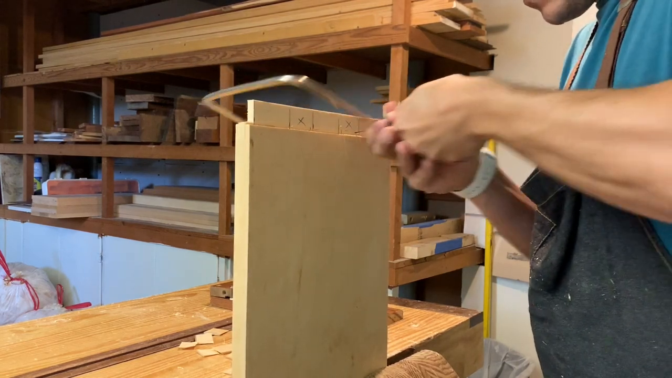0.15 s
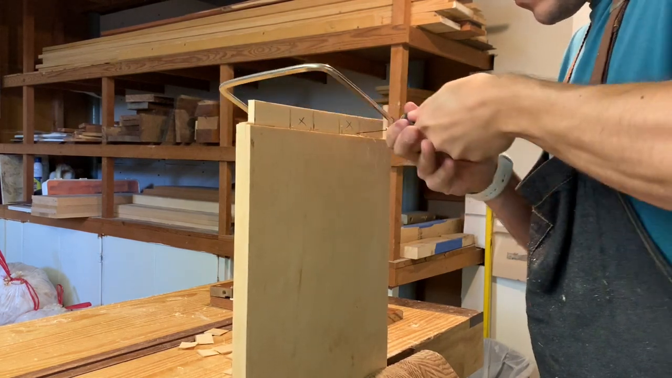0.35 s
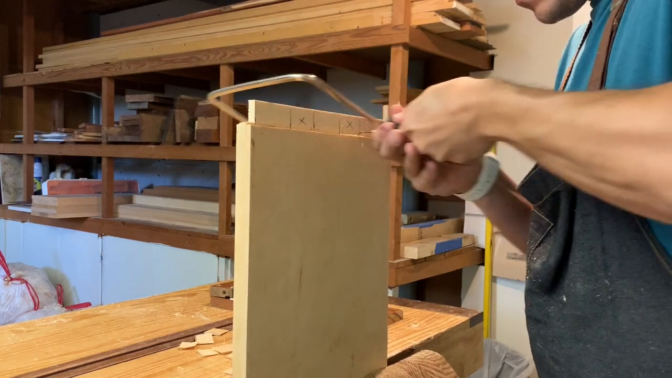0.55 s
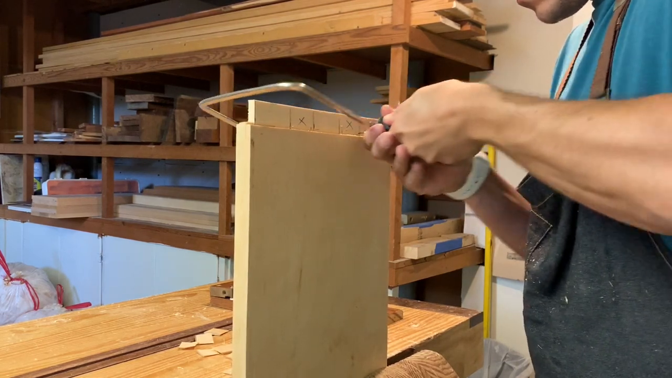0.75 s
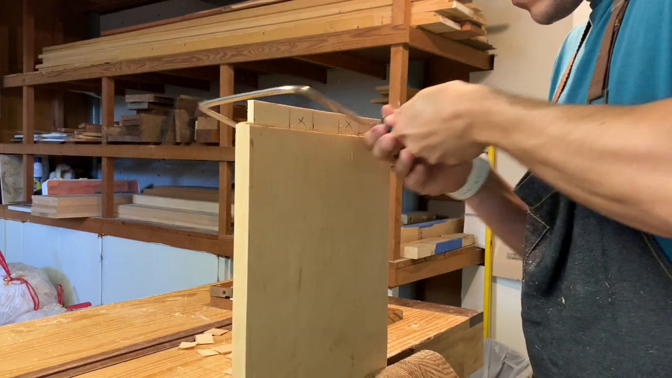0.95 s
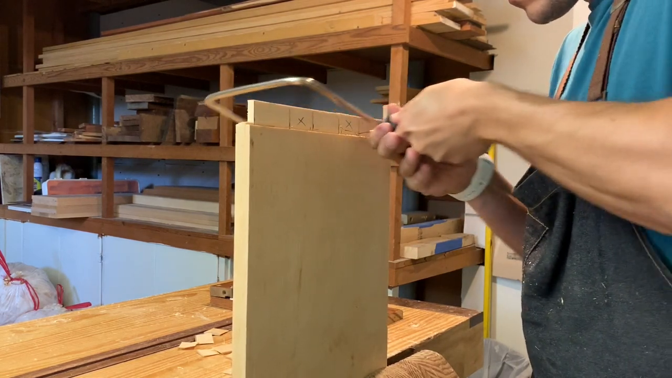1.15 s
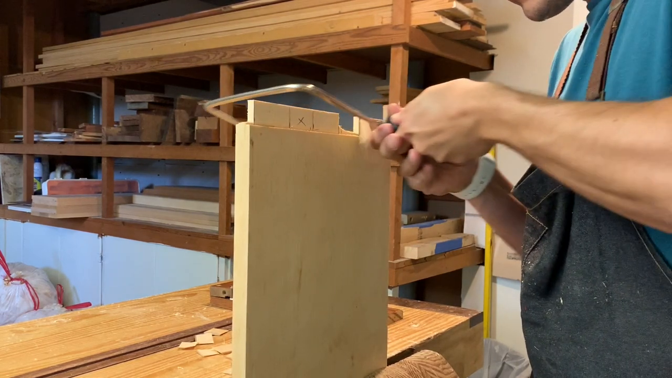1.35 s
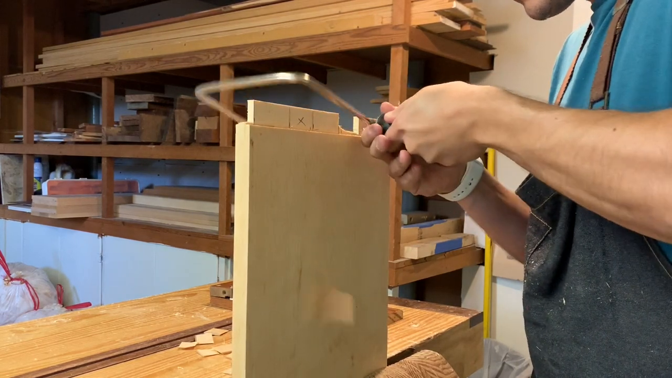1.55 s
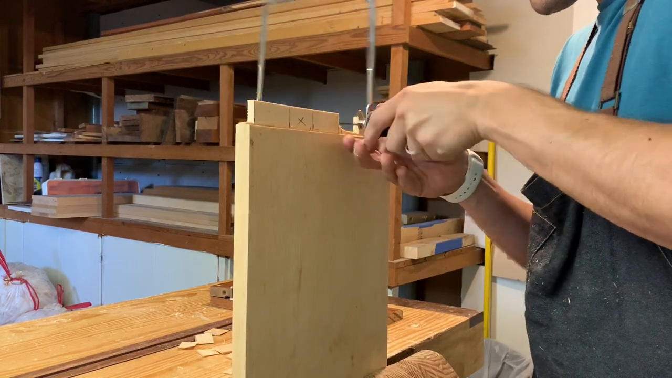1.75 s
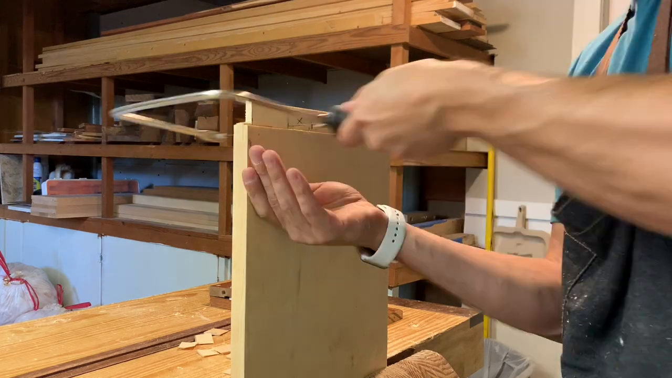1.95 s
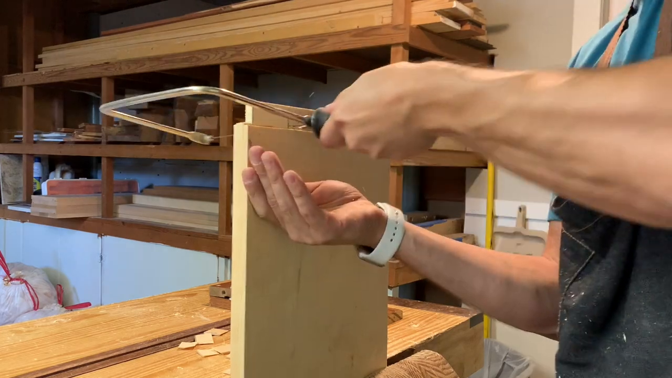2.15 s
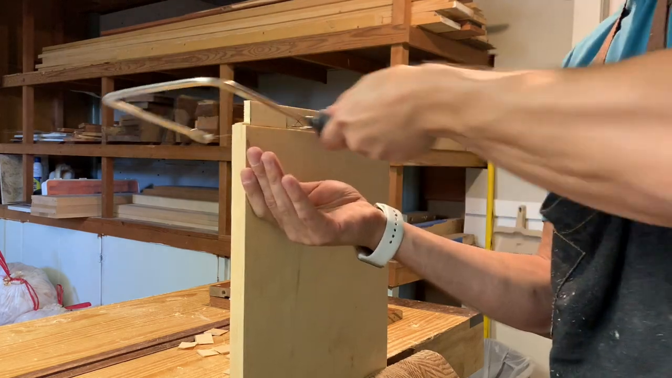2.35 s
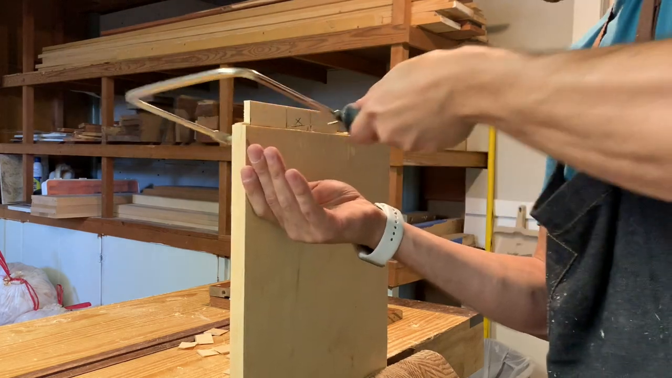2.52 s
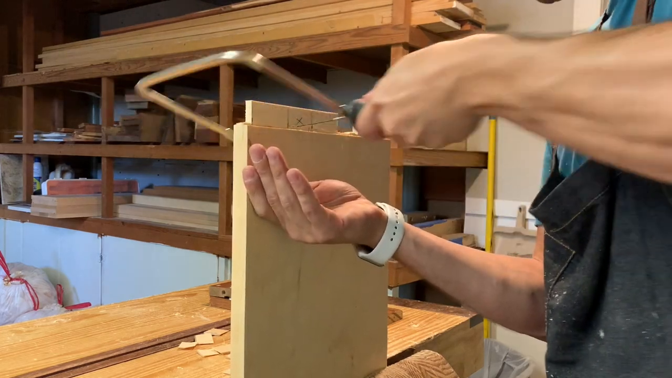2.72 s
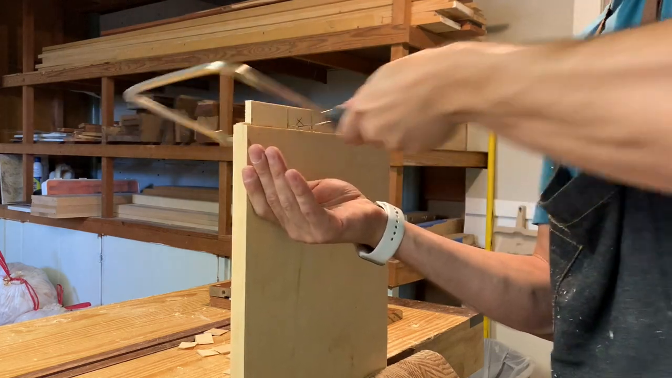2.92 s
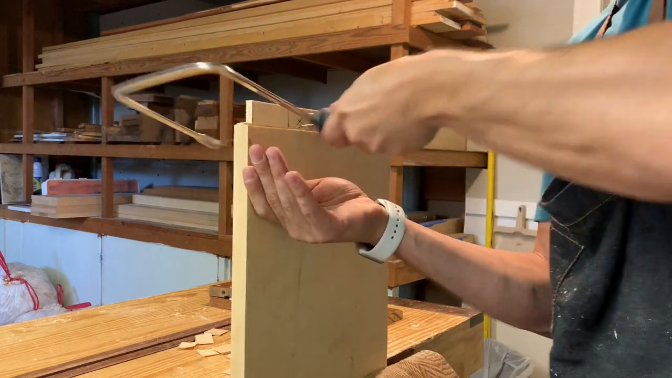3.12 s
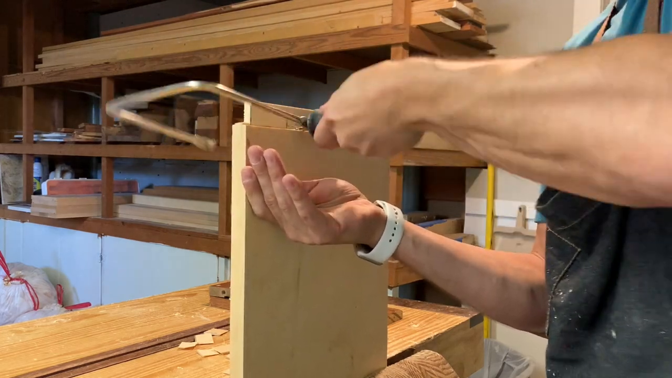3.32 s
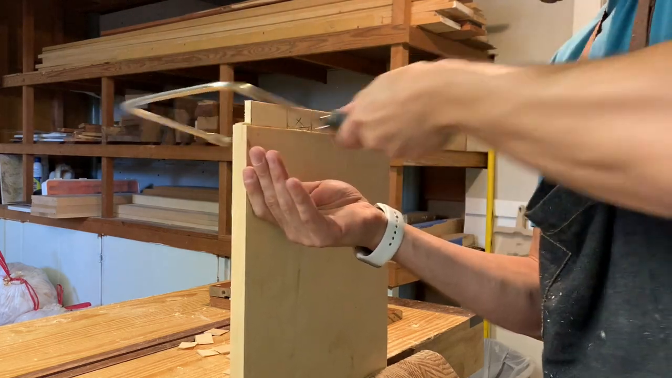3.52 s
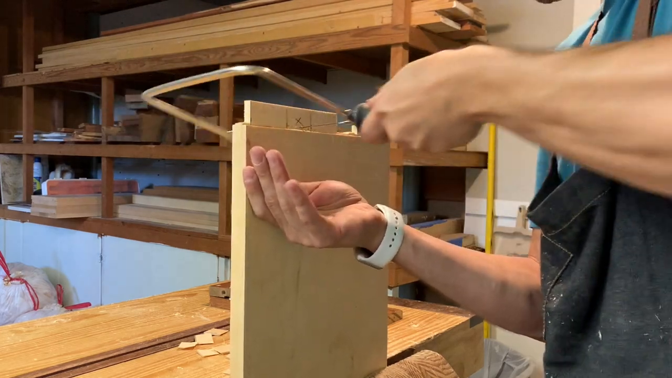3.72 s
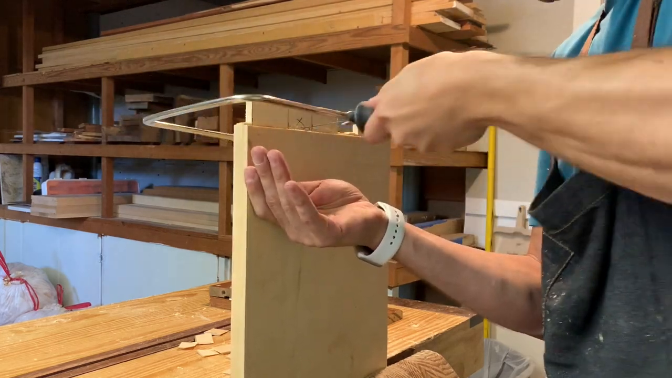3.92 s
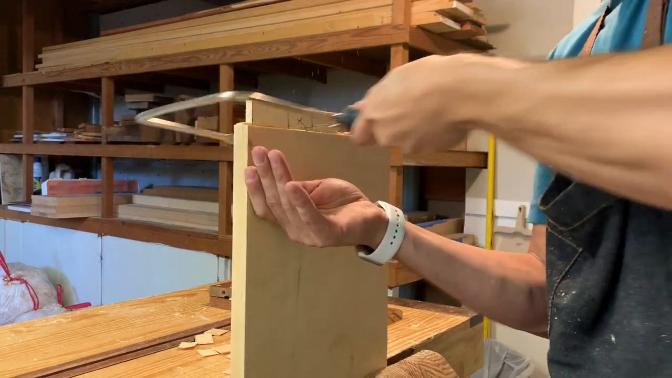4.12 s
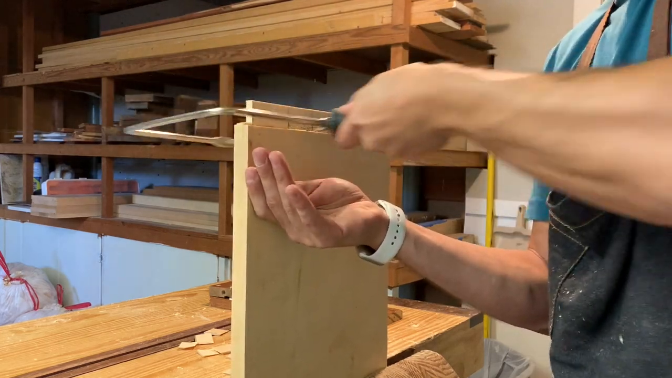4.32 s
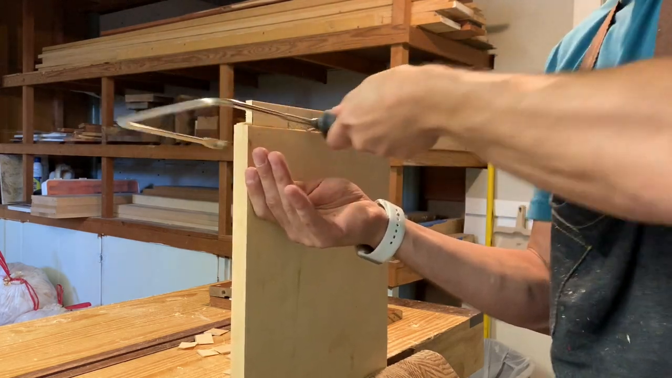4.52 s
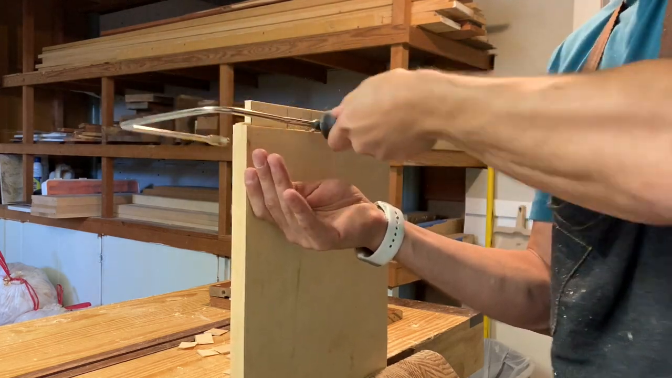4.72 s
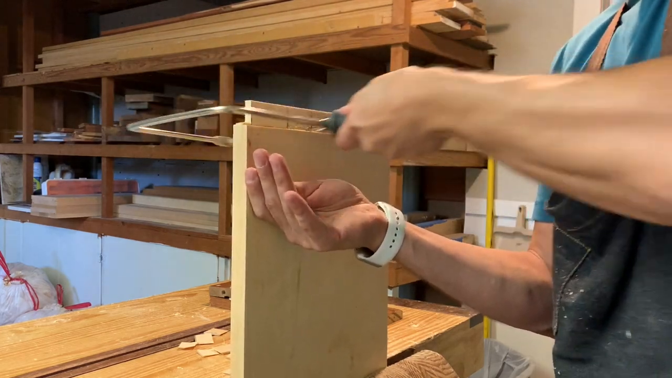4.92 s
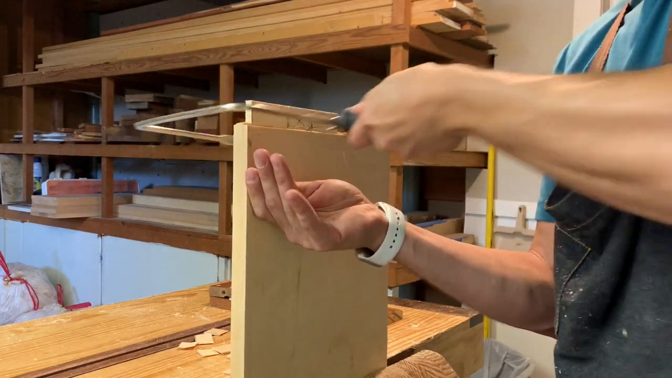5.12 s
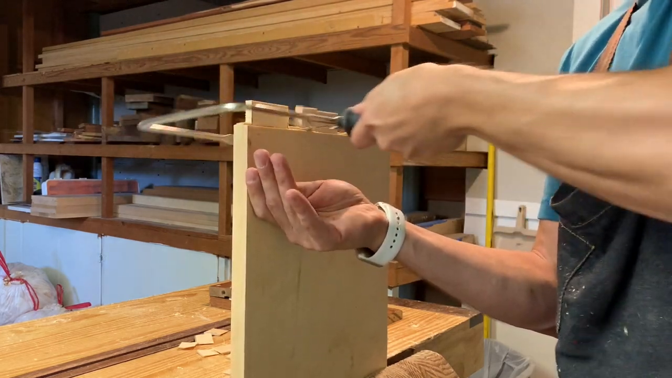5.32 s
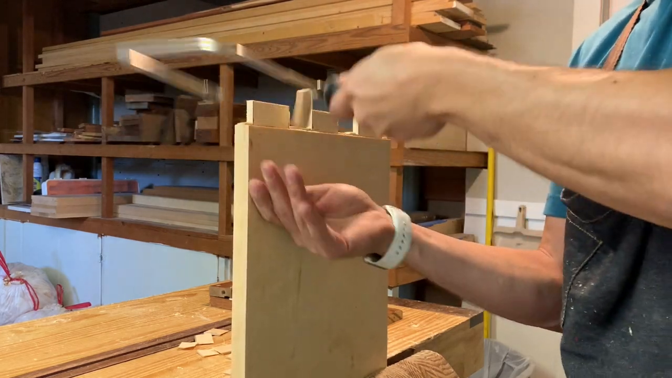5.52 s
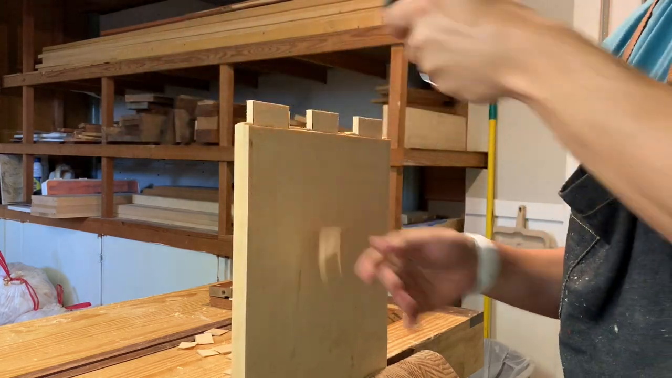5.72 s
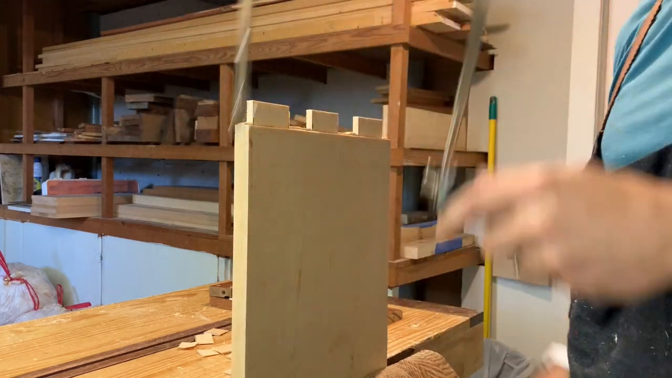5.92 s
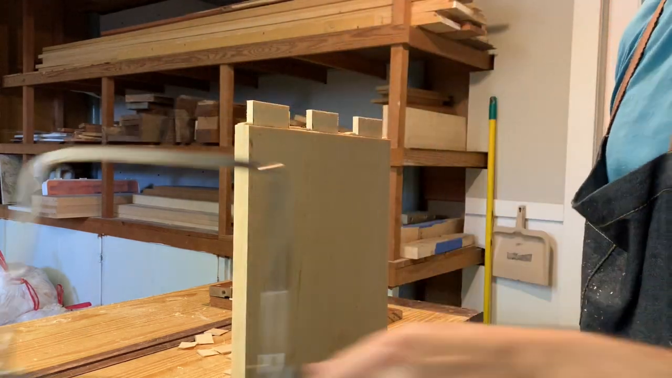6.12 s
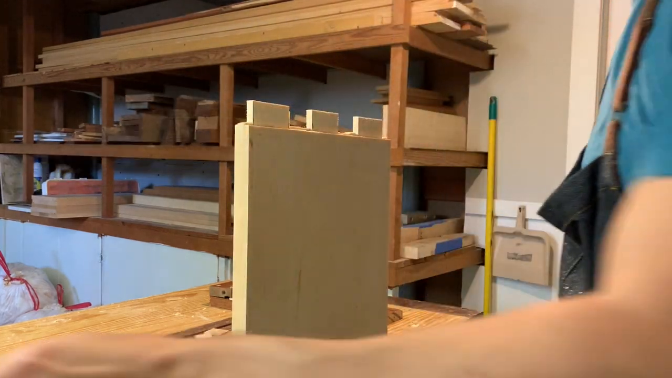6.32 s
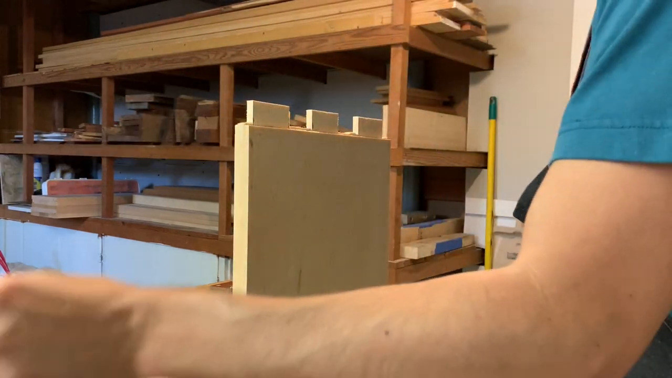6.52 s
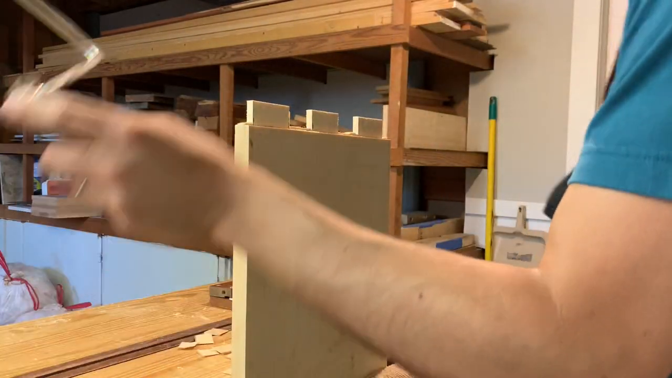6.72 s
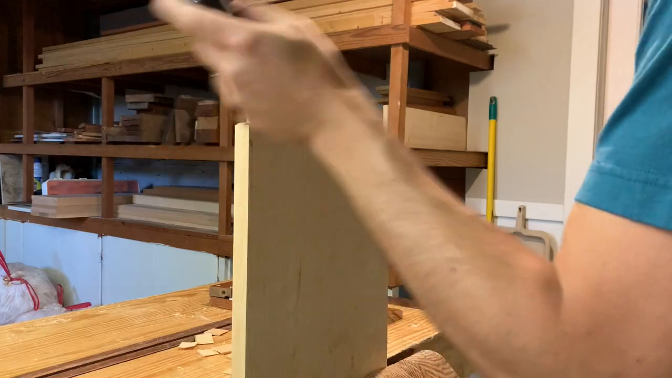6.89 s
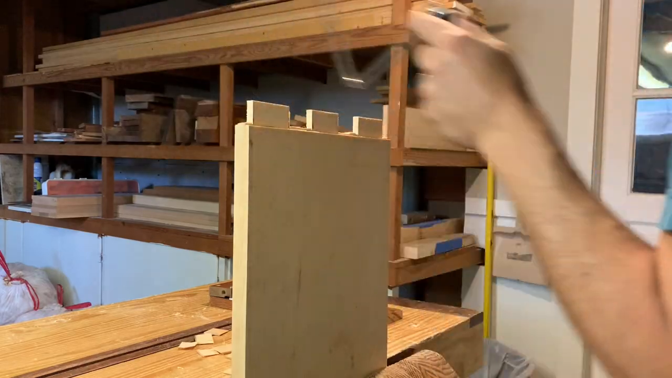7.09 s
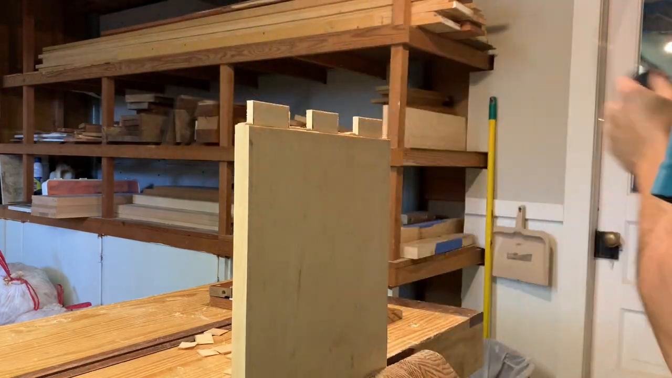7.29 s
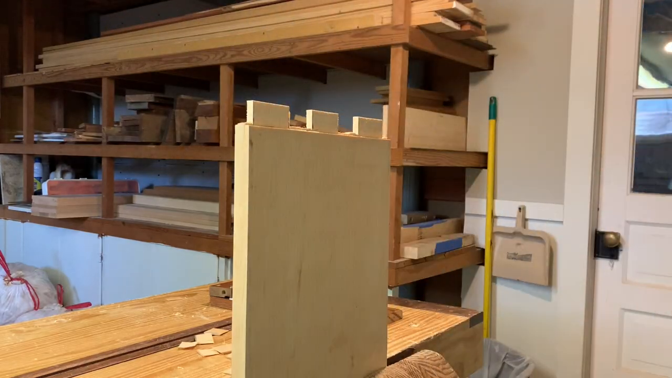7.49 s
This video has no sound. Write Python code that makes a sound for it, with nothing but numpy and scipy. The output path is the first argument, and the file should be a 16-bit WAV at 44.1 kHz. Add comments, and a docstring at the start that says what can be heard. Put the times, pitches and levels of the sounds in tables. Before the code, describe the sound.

A coping saw rasps through a wooden board in quick strokes, pausing briefly, then its steel frame clinks in a quiet workshop.

```python
"""A coping saw rasps through a clamped board, loud pushes and soft pulls, two cuts across its end.
The teeth scrape, catch on fibres and shake the board's modes, while the thin blade sings along.
The steel frame clinks, an offcut drops and sleeves swish over the low rumble of a workshop.
Two close microphone ports hear all of it, and the room, with unlike phase."""
import sys
import numpy as np
from scipy import signal
from scipy.fft import rfft, irfft, next_fast_len
from scipy.io import wavfile
from scipy.ndimage import uniform_filter1d, map_coordinates

SR = 44100
rng = np.random.default_rng(int(sys.argv[2]) if len(sys.argv) > 2 else 0)


def store_pcm(level_fs):
    """Save levels as 16-bit WAV."""
    pcm = np.round(np.clip(level_fs, -1, 1) * 32767).astype(np.int16)
    wavfile.write(sys.argv[1], SR, np.atleast_2d(pcm).T)


N = 332955
TIME = np.arange(N) / SR
SECOND_CUT_S = 1.6  # the blade moves to another place on the board

# A push and its pull. Each row: start in seconds; delays in seconds to the bite, the board's peak and
# the pull; push level in dB; rasp, crunch, whine, hum and thud in dB over the push; pull level in dB;
# whine in dB over the pull.
STROKES = [(0.0, 0.00023, 0.0088, 0.12, -23.5, -14, -8.5, -11.5, 4, 4.5, -38.5, -11.5),
           (0.236, 0.016, 0.12, 0.17, -27.5, -12.5, -7.5, -11, 0.5, 4.5, -36, -15),
           (0.511, 0.01, 0.08, 0.15, -28, -11.5, -8, -5, 3, 3.5, -39.5, -16),
           (0.769, 0.019, 0.12, 0.14, -28, -14, -7.5, -5, 6.5, 4, -43.5, -7),
           (1.019, 0.0053, 0.049, 0.099, -31.5, -12.5, -9, -16.5, 6, 4, -42, -7.5),
           (1.225, 0.013, 0.068, 0.13, -25, -15, -19.5, -14.5, 8, 3.5, -48, 4.5),
           (1.977, 0.002, 0.025, 0.07, -22.5, -22, -13, -8.5, 4.5, -7, -32, -4),
           (2.154, 0.0089, 0.039, 0.14, -22, -14, -10, -0.5, 7, -4, -33, -6),
           (2.402, 0.0027, 0.044, 0.12, -22.5, -12.5, -15, -5, -16, -0.5, -36.5, -13.5),
           (2.633, 0.014, 0.064, 0.12, -22.5, -13, -10.5, -5, 6, -6, -35, -5),
           (2.869, 0.01, 0.061, 0.12, -21.5, -16, -14.5, -7, 3.5, -7.5, -33, -5.5),
           (3.107, 0.012, 0.04, 0.12, -22, -14, -14, -4, 5, 2.5, -33.5, 3.5),
           (3.348, 0.015, 0.06, 0.12, -21, -13.5, -11, -9, 7.5, -2.5, -35.5, -6),
           (3.592, 0.01, 0.061, 0.12, -23, -13, -12.5, -4.5, 11, -9.5, -35.5, -4.5),
           (3.827, 0.019, 0.066, 0.117, -20.5, -19, -13.5, -12, 4.5, -4.5, -35.5, -1),
           (4.058, 0.0071, 0.063, 0.1196, -22, -16.5, -9.5, -6.5, 3, -7.5, -34, -2.5),
           (4.289, 0.016, 0.073, 0.12, -21.5, -14, -10, -7.5, 3.5, -9, -33, -8.5),
           (4.519, 0.015, 0.051, 0.12, -24.5, -11, -8, -1, 1.5, 0, -35, 0),
           (4.739, 0.0019, 0.092, 0.12, -24, -13.5, -11, -5.5, -4, -5.5, -33, -6.5),
           (4.973, 0.0036, 0.034, 0.11, -26.5, -17, -6.5, -7, 4, 1, -35.5, -11),
           (5.198, 0.0011, 0.053, 0.11, -30, -11, -9, -7.5, -2, 0.5, -38.5, -10)]
def half_strokes():
    """Each push and pull: start, bite, peak, length in s; dB of rasp, crunch, ring, whine, hum, thud."""
    for start, bite, peak, turn, push_db, rasp, crunch, whine, hum, thud, pull_db, pull_whine in STROKES:
        yield start, bite, peak, turn, push_db + np.array([rasp, crunch, 0, whine, hum, thud])
        if start < SECOND_CUT_S:
            pull_mix_db = [-18, -5.5, 0, pull_whine, 6, 2.5]
        else:
            pull_mix_db = [-9, -8, 0, pull_whine, 3, -8]
        yield start + turn, 0, .062, .1, pull_db + np.array(pull_mix_db)


def saw():
    """The rasp follows blade speed; the heavier board swings up later. Returns wood and blade sound."""
    speed, scrape = np.zeros((2, N))
    forces = np.zeros((5, N))  # into crunch, ring, whine, hum, thud
    sharpness = np.array([[1], [1.1], [1.2], [1.6], [1.05]])  # of each force's swell
    for start, bite, peak, length, (rasp_db, *board_db) in half_strokes():
        span, hump = swell(start, peak=.044, length=length + .012, rise=.6, fall=2.2)
        speed[span] += hump ** .5
        scrape[span] += amp(rasp_db) * hump
        span, hump = swell(start + bite, peak - bite, length - bite + .011, rise=.32, fall=1.86)
        forces[:, span] += amp(board_db)[:, None] * hump ** sharpness
    grit = teeth(speed, top_hz=530, jitter=.35, scatter_db=2, dust=.81)
    shove = teeth(speed, top_hz=520, jitter=.26, scatter_db=4.5, dust=.48)
    grit *= amp(2.2 * wobble(70))  # hard and soft rings of the grain
    shove *= amp(1.2 * wobble(60))
    forces *= [grit, shove, chatter(shove, 880, 1060), chatter(shove, 340, 480), shove]
    forces *= amp([1.7 * wobble(35) - 1.5 for _ in forces])  # the wandering blade drives modes unevenly
    jolts, snags, snaps = fibre_catches()
    forces += jolts
    steel = blade(scrape * grit, snags)
    wood = board(forces[1:]) + crunch(forces[0]) + waste_piece(forces[0]) + snaps
    return wood, steel


def teeth(speed, top_hz, jitter, scatter_db, dust):
    """One kick per passing tooth, uneven in time and size; dust is the power share of torn-fibre hiss."""
    passed = np.cumsum(top_hz * speed / SR)
    at = np.flatnonzero(np.diff(np.floor(passed)) > 0)
    timing, size = rng.standard_normal((len(at), 2)).T
    at = np.clip(at + (jitter * timing * SR / top_hz).astype(int), 0, N - 1)
    kicks = np.bincount(at, amp(scatter_db * size), N)
    kicks /= np.sqrt(np.abs(uniform_filter1d(kicks ** 2, size=2048)) + 1e-9)
    return np.sqrt(1 - dust) * kicks + np.sqrt(dust) * rng.standard_normal(N)


def chatter(force, low_hz, high_hz):
    """The blade chatters: one band of the tooth force, its strength evened out over 20 ms."""
    band = filtered(force, lambda hz: (hz > low_hz) & (hz < high_hz))
    power = np.abs(uniform_filter1d(band ** 2, size=round(.02 * SR))) + 1e-9
    return band * np.sqrt(2 * (high_hz - low_hz) / SR / power)


# The board's voice in four groups of modes; the two narrow lines near 200 and 245 Hz among the thuds # are the
# saw frame ringing along. Each row: pitch in Hz, width in Hz, level in dB in the first cut and # in the second.
RING_MODES = [(549, 12, 6.5, 3), (600.8, 23.3, 10, 12.5), (647, 28, 7.5, 5.5), (693.3, 34, 0, 2.5),
              (881, 67, 0.5, -0.5)]
WHINE_MODES = [(966, 26.8, 0, 0)]
HUM_MODES = [(363.8, 83, 2.5, -21), (405.1, 12, 9, 9.5), (463, 64, -3, -5.5)]
THUD_MODES = [(75.4, 36, -11.5, -17.5), (93.5, 85, -20.5, -24.5), (190.3, 16.6, 6.5, 2.5),
              (201.8, 0.74, -6, 4.5), (244.3, 0.71, -26, 3.5), (258, 98, 4, -4), (307, 40, -14.5, 8.5)]
def board(forces):
    """The clamped board resonates, with the saw frame ringing in the thuds, each group of modes driven by its
    own force."""
    groups = RING_MODES, WHINE_MODES, HUM_MODES, THUD_MODES
    return sum(resonate_by_cut(force, modes) for force, modes in zip(forces, groups))


# The board's crunchy upper modes. Each row: pitch in Hz, width in Hz, level in dB in the first cut
# and in the second.
CRUNCH_MODES = [(1123, 120, 0, 1.5), (1316, 110, 10, 9.5), (1337, 200, 1.5, 12), (1650, 160, 4, 11.5),
                (1940, 140, -1, 11.5), (2044, 170, 5, 14.5), (2644, 330, -8, -3.5), (3256, 350, -16, -12)]
def crunch(force):
    """The upper modes shift in pitch and strength with each half stroke, as the blade turns in the kerf."""
    out = np.zeros(N + 2048)
    edges = [round(start * SR) for start, *_ in half_strokes()] + [N]
    for begin, end in zip(edges, edges[1:]):
        cut = int(begin > SECOND_CUT_S * SR)
        draws = rng.standard_normal((len(CRUNCH_MODES), 2))
        modes = [(hz * (1 + .015 * stray), width, cut_db[cut] + 2 * vary)
                 for (hz, width, *cut_db), (stray, vary) in zip(CRUNCH_MODES, draws)]
        out[begin:end + 2048] += resonate(np.pad(force[begin:end], (0, 2048)), modes)
    return out[:N]


# The colour of the rasp. Each row: frequency in Hz, relative level in dB.
RASP_COLOUR = [(2500, 14.5), (4000, 6.5), (5000, 3), (6900, 5.5), (8000, -44), (9600, 8.5), (11500, 6),
               (13500, 0), (15200, -16), (16000, -19)]
# The blade's song. Each row: pitch in Hz, width in Hz, level in dB in the first cut and in the second.
BLADE_MODES = [(3550, 130, 10, -0.5), (4220, 140, 4, -6), (5580, 820, 1, 1), (9100, 2900, -0.5, 1)]
def blade(scrape, snags):
    """Scraping teeth hiss in short bright bursts and set the blade itself ringing."""
    song = resonate_by_cut(scrape * amp(-9.5 + 2.5 * wobble(12)), BLADE_MODES)
    bursts = scrape * amp(2 * wobble(80)) + snags
    rasp = filtered(bursts, lambda hz: amp(along(RASP_COLOUR, hz)), keep_power=True)
    return rasp + song


# Teeth snagging. Each row: time in seconds, level in dB, bass trim in dB for hum and thud.
CATCHES = [(0.0382, -28.5, 7), (0.2904, -20, 1.5), (0.325, -13.5, -23.5), (0.5217, -24, 5.5),
           (0.5642, -11, -9), (0.577, -14, 9), (.616, -18, -4), (0.7951, -18.5, 1), (0.8013, -20, 4.5),
           (.832, -15, 4), (.840, -18.5, 7.5), (0.8774, -20.5, -5.5), (1.0254, -27.5, -0.5),
           (1.056, -23, 13.5), (1.119, -25.5, 7.5), (1.2444, -23, 3), (1.2687, -12, -3.5),
           (1.293, -23.5, 2), (1.307, -23.5, 3), (1.9843, -25, 16.5), (2.164, -23, 5), (2.186, -17, 1),
           (2.41, -30.5, 7), (2.435, -9, 2), (2.6575, -19, 6.5), (2.889, -25.5, 3), (2.9046, -15.5, 0),
           (3.1423, -21, 8), (3.359, -20, 7), (3.6377, -20, -0.5), (3.84, -24, 1), (4.302, -26, 6),
           (4.984, -29, -1.5)]
# The snap of a fibre. Each row: pitch in Hz, width in Hz, relative level in dB.
SNAP_MODES = [(2050, 440, -1), (2900, 800, -4.5)]
def fibre_catches():
    """A tooth catches and the fibre breaks. Returns board forces, snags for the rasp and the snap sound."""
    jolts = np.zeros((5, N))
    snags, snaps = np.zeros((2, N))
    t = TIME[:900]
    t60_s = np.array([[.005], [.007], [.007], [.003], [.003]])  # crunch, ring, whine, hum, thud
    attack_s, snap_t60_s = .001, .0044
    for start, db, bass_db in CATCHES:
        span = slice(round(start * SR), round(start * SR) + len(t))
        snag_db, snap_db = (-24.5, -7.5) if start < SECOND_CUT_S else (-20, -11)
        burst = rng.standard_normal(len(t)) * amp(-60 * t / t60_s) * (1 - np.exp(-t / attack_s))
        burst *= 6.6 / np.linalg.norm(burst, axis=1, keepdims=True)
        burst[3:] = np.abs(burst[3:])  # hum and thud get a one-way jolt
        mix_db = np.array([-1, -1, -7, bass_db - 13.5, bass_db - 13.5])
        jolts[:, span] += amp(db + mix_db)[:, None] * burst
        snags[span] += amp(db + snag_db) * burst[1]
        snaps[span] += amp(db + snap_db - 60 * t / snap_t60_s) * rng.standard_normal(len(t))
    return jolts, snags, resonate(snaps, SNAP_MODES)


# The waste piece's pitch path. Each row: time in seconds, pitch in Hz, level in dB over the crunch.
WASTE_PATH = [(.05, 2710, -12), (.3, 2350, -13), (.6, 2150, -10), (.85, 1860, -7.5), (1.3, 2050, -9),
              (2.001, 3430, -9), (2.2, 3350, -10.5), (2.33, 2700, -6), (2.45, 2430, -9), (2.68, 2050, 0),
              (2.92, 1650, 2), (3.2, 1430, -3.5), (3.42, 1950, -5.5), (3.64, 2100, -3.5), (3.88, 2740, -10),
              (4.1, 2900, -7.5), (4.35, 2719, -7), (4.58, 2419, -6.5), (4.8, 2060, -2), (5.03, 1599, -3.5),
              (5.26, 1942, -8)]
def waste_piece(force, width_hz=300):
    """The waste piece rings at one pitch per half stroke, in runs that fall as the kerf frees it."""
    out = np.zeros(N)
    times, pitches, levels = np.transpose(WASTE_PATH)
    for start, _, peak, length, _ in half_strokes():
        span = slice(round(start * SR), round((start + length) * SR))
        stray, vary = rng.standard_normal(2)
        hz = np.interp(start + peak, times, pitches) * (1 + .02 * stray)
        db = np.interp(start + peak, times, levels) + 1.5 * vary
        ring = resonate(np.pad(force[span], (0, 1024)), [(hz, width_hz, 0)])
        out[span.start:][:len(ring)] += amp(db) * ring
    return out


# Hard contacts of frame and offcut. Each row: time in seconds, level in dB, pitch in Hz, the note's
# life in cycles, frame ring trim in dB, room send in dB.
CLINKS = [(1.262, -30.5, 14300, 40, -51, 2.5), (1.302, -37, 12000, 30, -52, -2),
          (1.728, -38, 2040, 19, -51.5, -5), (1.845, -42.5, 3067, 73, -17, 0.5),
          (1.856, -37, 860, 54, -29, 1), (1.865, -28.5, 2347, 310, -30.5, -0.5),
          (1.875, -41.5, 914, 70, -28.5, -2), (1.896, -13, 3960, 81, -21.5, 5),
          (1.905, -14.5, 7530, 30, -24, -7.5), (6.0701, -1.5, 6880, 9.6, -40, -5.5),
          (6.073, -32, 418.6, 5.3, -39, -7), (6.0744, -14.5, 4020, 17, -22.5, -0.5),
          (6.457, -23, 2360, 9.1, -21, -6), (6.461, -22, 6200, 24, -24, -0.5),
          (6.527, -31.5, 6890, 8.8, -21, 2.5), (6.632, -48, 4100, 168, -19, 6)]
# The steel frame's ring. Each row: pitch in Hz, level in dB, seconds to fall 60 dB.
FRAME_MODES = [(3940, 1, 0.17), (7350, 3.5, 0.1), (8600, -1.5, 0.26), (10900, -4, 0.15)]
def clinks(direct_db=-6.5, crack_t60_s=.003):
    """A contact cracks, sounds a short note and rings the loose frame. Returns direct sound, room send."""
    out, t = np.zeros((2, N + SR)), TIME[:SR // 2]
    for start, db, hz, cycles, ring_db, room_db in CLINKS:
        splinters = .15 * amp(-60 * t / crack_t60_s) * rng.standard_normal(len(t))
        impact = (t == 0) + splinters
        edge = signal.lfilter(*signal.butter(2, [2500, 10500], 'band', fs=SR), impact)
        knock = signal.lfilter(*signal.butter(1, [350, 2500], 'band', fs=SR), impact)
        crack = 1.7 * (edge / np.linalg.norm(edge) + amp(-12) * knock / np.linalg.norm(knock))
        envelope = amp(-60 * t * hz / cycles) * (1 - np.exp(-t * hz)) ** 2
        note = 1.1 * envelope * np.sin(2 * np.pi * hz * t)
        drifts = .11 * np.cumsum(rng.standard_normal((len(FRAME_MODES), len(t))), 1)  # blur each partial
        ring = sum(amp(level - 60 * t / t60) * np.sin(2 * np.pi * pitch * t + drift)
                   for (pitch, level, t60), drift in zip(FRAME_MODES, drifts))
        tones = note + amp(ring_db) * ring
        direct = amp(db + direct_db) * (crack + tones)
        send = amp(db + room_db) * (crack + .2 * tones)
        out[:, round(start * SR):][:, :len(t)] += [direct, send]
    return out[:, :N]


# Hands and sleeves. Each row: start in seconds, length in seconds, level in dB, tilt in dB per octave.
SWISHES = [(1.695, 0.23, -52, -10), (1.834, 0.17, -50.5, -8), (5.795, 0.12, -72, -12.5),
           (5.927, 0.22, -63, -0.5), (6.471, 0.072, -57.5, -3.5), (6.621, 0.38, -66, -5),
           (7.045, 0.082, -74, -2), (7.177, .16, -68.5, 1.5), (7.288, 0.46, -52.5, -1.5)]
def swishes():
    """Brushing cloth makes soft, grainy noise that swells quickly and fades."""
    out = np.zeros(N)
    for start, length, db, tilt_db in SWISHES:
        span, hump = swell(start, .099 * length, length, rise=.86, fall=8.9)
        rub = rng.standard_normal(len(hump))
        grain = amp(.99 * rng.standard_normal(len(hump) // 64 + 1)).repeat(64)[:len(hump)]
        colour = lambda hz: amp(tilt_db * np.log2((hz + 50) / 3000)) * hz / (hz + 600)
        out[span] += amp(db) * hump * filtered(rub * grain, colour, keep_power=True)
    return out


# The workshop's reverb. Each row: frequency in Hz, seconds to fall 60 dB, level in dB.
ROOM_DECAY = [(100, .6, -2), (260, .75, -4), (420, .33, -8), (750, .36, 1), (970, .33, -4), (1300, .36, 0),
              (2000, .37, 0), (5000, .32, 0), (9600, .3, 0), (11500, .24, -4), (15000, .2, -5)]
def room(send, predelay_s=.004):
    """A diffuse room tail, drawn afresh each quarter second so no pitch stands out."""
    out, step = np.zeros((2, N + SR)), SR // 4
    for at in range(0, N, step):
        hz, t, spectrum = signal.stft(diffuse_noise(SR * 2 // 3), SR, nperseg=256)
        fade = amp(-60 * t / along(ROOM_DECAY, hz)[:, None])  # each frequency dies at its own speed
        fade /= np.sqrt(np.sum(fade ** 2, 1, keepdims=True) * 128)
        fade *= amp(along(ROOM_DECAY, hz, column=2))[:, None]
        _, tail = signal.istft(spectrum * fade, SR, nperseg=256)
        wet = signal.fftconvolve(send[None, at:at + step], tail, axes=1)
        rest = out[:, at + round(predelay_s * SR):]
        rest[:, :wet.shape[1]] += wet[:, :rest.shape[1]]
    return out[:, :N]


# The room tone's colour. Each row: frequency in Hz, relative level in dB.
AIR_COLOUR = [(15, -52.5), (25, -28.5), (66, -2.5), (129, -9.5), (215, -15), (289, -17), (469, -16.5),
              (741, -25), (826, -24), (14300, -52), (15500, -44.5)]
# A machine far off. Each row: pitch in Hz, width in Hz, relative level in dB.
DRONE_MODES = [(69.2, 9.1, 0), (126, 6.6, 8.5)]
def workshop_air():
    """Gently wavering rumble and faint hiss, with the low drone of a distant machine."""
    waver = amp(.67 * wobble(2.9))
    rumble = filtered(diffuse_noise(N), lambda hz: amp(along(AIR_COLOUR, hz)), keep_power=True)
    drone = resonate(rng.standard_normal(N), DRONE_MODES)
    return amp(-61.5) * waver * rumble + amp(-64) * drone


# The width of the ambience. Each row: frequency in Hz, correlation between the ports (1 is mono).
PORT_LIKENESS = [(60, .85), (240, .8), (700, .1), (3000, .1), (5000, -.1), (7000, .4), (8800, .97),
                 (10300, .98), (11300, .7), (12600, .97), (14300, .97), (15500, .4)]
def diffuse_noise(samples):
    """Sound from all around reaches the two ports as partly alike noise."""
    def mid_side(hz):
        angle = np.arccos(along(PORT_LIKENESS, hz)) / 2
        return np.array([np.cos(angle), np.sin(angle)])
    mid, side = filtered(rng.standard_normal((2, samples)), mid_side)
    return np.array([mid + side, mid - side])


def amp(db):
    """Gain of a level in dB."""
    return 10 ** (np.asarray(db) / 20)


def along(table, hz, column=1):
    """One column of a table, read on a log frequency axis."""
    columns = np.transpose(table)
    return np.interp(np.log(hz + 1), np.log(columns[0] + 1), columns[column])


def wobble(rate):
    """A smooth random curve, rate knots a second."""
    return map_coordinates(rng.standard_normal(int(N * rate / SR) + 4), [TIME * rate])


def swell(start, peak, length, rise, fall):
    """The samples a hump covers and the hump, of height 1; times in s, rise and fall are exponents."""
    span = slice(round(start * SR), round((start + length) * SR))
    t = TIME[span] - start
    ramp = np.where(t < peak, t / peak, (length - t) / (length - peak))
    return span, np.sin(np.pi / 2 * np.clip(ramp, 0, 1)) ** np.where(t < peak, rise, fall)


def filtered(x, response, keep_power=False):
    """x through a complex frequency response; keep_power leaves white noise as strong as it was."""
    size = next_fast_len(x.shape[-1] + 8192)
    gain = response(np.fft.rfftfreq(size, 1 / SR))
    if keep_power:
        gain = gain / np.sqrt(np.mean(np.abs(gain) ** 2))
    return irfft(rfft(x, size) * gain, size)[..., :x.shape[-1]]


def resonate(force, modes, cut=0):
    """A force rings damped resonances of alternating sign; cut picks their level column."""
    def response(f):
        return sum((-1) ** k * amp(db[cut]) * 1j * f * width / (hz ** 2 - f * f + 1j * f * width)
                   for k, (hz, width, *db) in enumerate(modes))
    return filtered(force, response, keep_power=True)


def resonate_by_cut(force, modes):
    """The place of the cut sets how strongly each mode is reached."""
    first = TIME < SECOND_CUT_S
    return resonate(force * first, modes, cut=0) + resonate(force * ~first, modes, cut=1)


def scene():
    """All sources, direct and through the room; the thin rasp is near and stirs the room less."""
    wood, steel = saw()
    clink, clink_send = clinks()
    cloth = swishes()
    reverb = room(wood + amp(-6.5) * steel + cloth + clink_send)
    return wood + steel + cloth + clink + reverb + workshop_air()


# Left and right differ in phase and level, nearly opposite in phase around 9-10 kHz.
# Each row: frequency in Hz, the right port's lead in radians, left minus right in dB.
PORT_GAPS = [(100, 0, 0), (350, .1, 1), (1400, .6, -1.5), (3400, 1.5, 1.5), (5000, 2.2, 2), (6900, 5.4, .8),
             (8000, 4.6, 0), (8800, 3.3, 0), (9200, 3.14, 0), (10200, 3.1, 0), (11000, 2, 0),
             (12300, .2, 0), (14500, -.2, 0), (15800, -2.5, 0)]
def record(dry, ceiling=.75, bass_cut_hz=30, top_hz=16000):
    """Two ports hear with a gap in phase and level; the input rounds loud peaks and trims both band ends."""
    side = np.array([[.5], [-.5]])
    def ports(hz):
        balance = amp(side * along(PORT_GAPS, hz, column=2))
        return balance * np.exp(-1j * side * along(PORT_GAPS, hz))
    heard = filtered(dry, ports)
    rounded = heard / (1 + np.abs(heard / ceiling) ** 4) ** (1 / 4)
    return filtered(rounded, lambda hz: (hz < top_hz) * (1j * hz / (bass_cut_hz + 1j * hz)) ** 2)


dry = scene()
out = record(dry)
store_pcm(out)
```